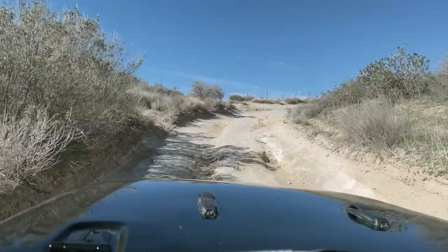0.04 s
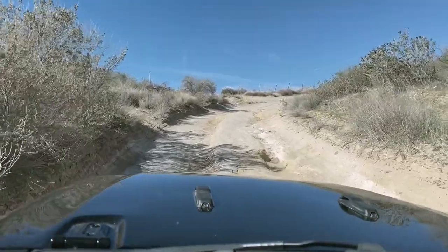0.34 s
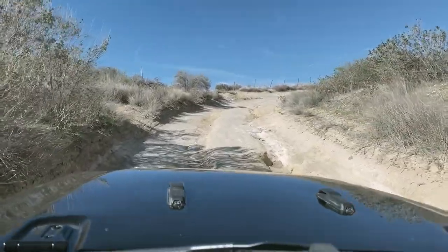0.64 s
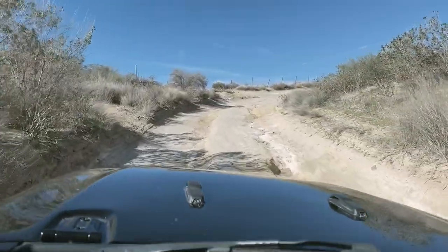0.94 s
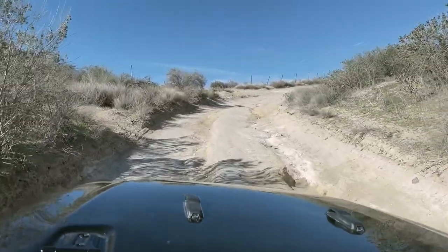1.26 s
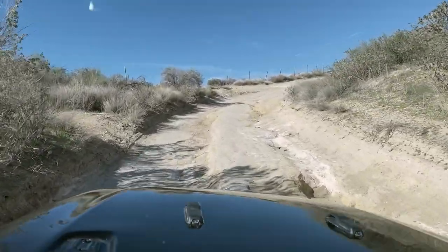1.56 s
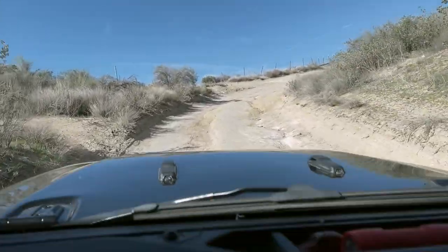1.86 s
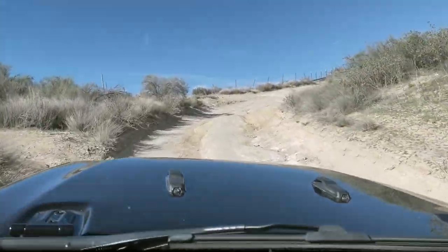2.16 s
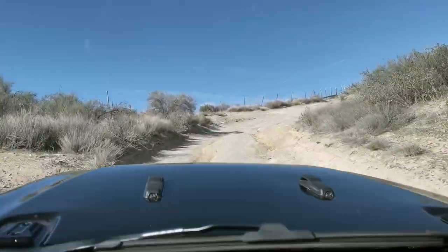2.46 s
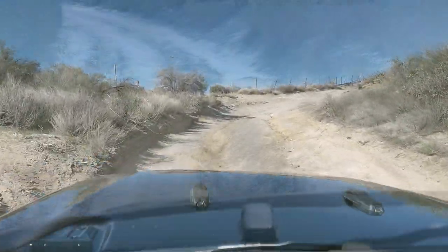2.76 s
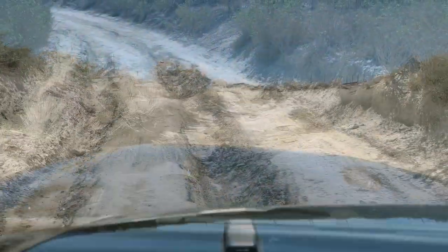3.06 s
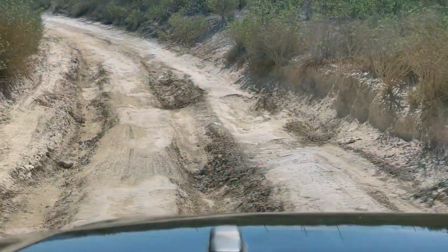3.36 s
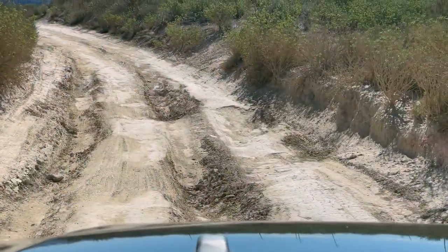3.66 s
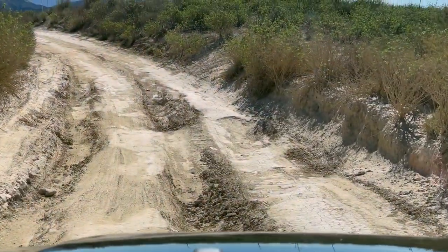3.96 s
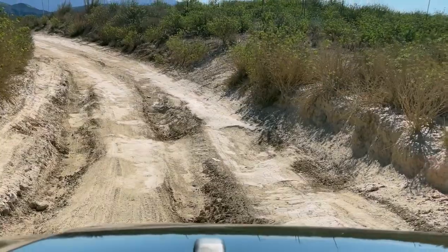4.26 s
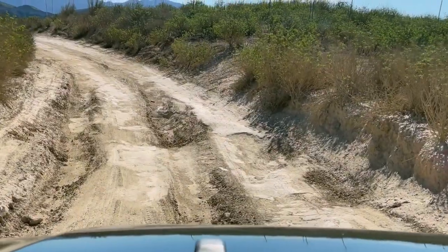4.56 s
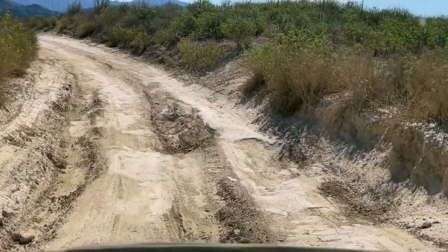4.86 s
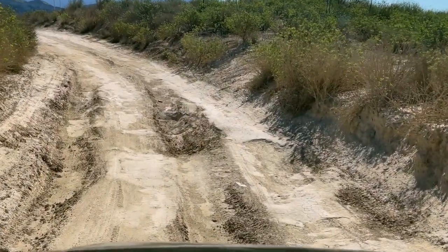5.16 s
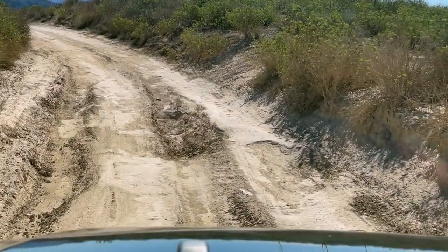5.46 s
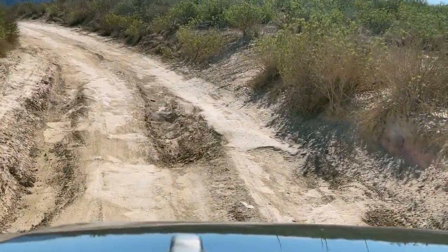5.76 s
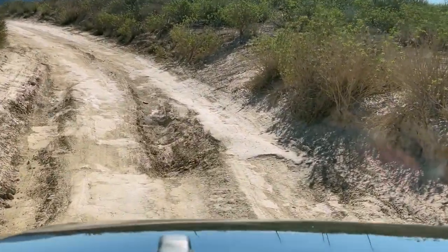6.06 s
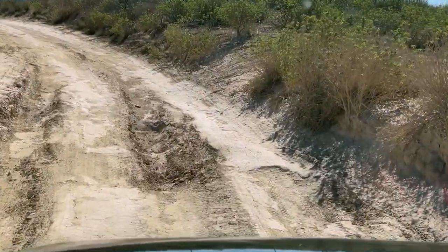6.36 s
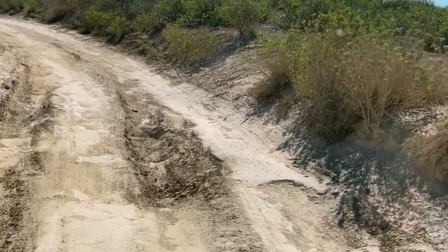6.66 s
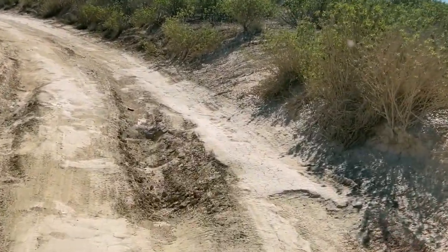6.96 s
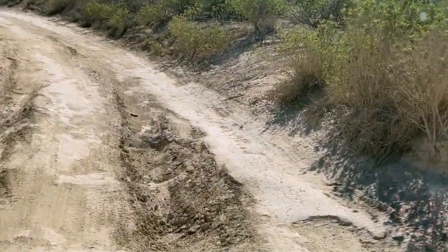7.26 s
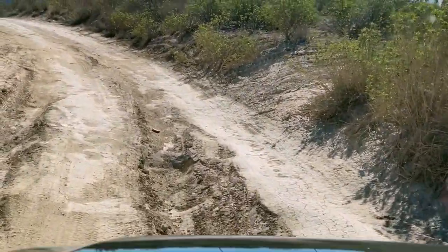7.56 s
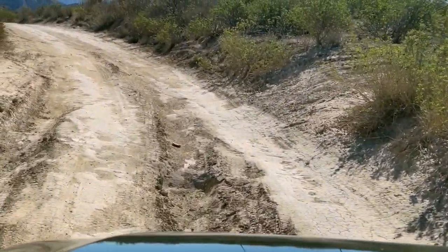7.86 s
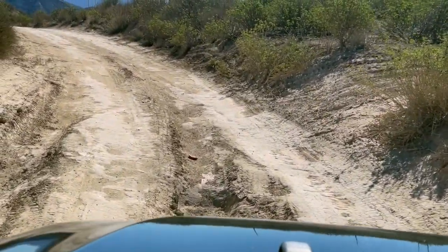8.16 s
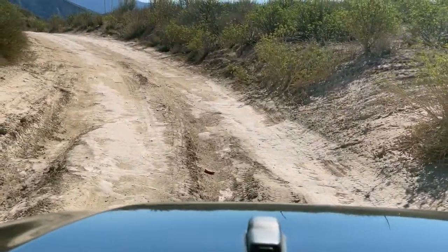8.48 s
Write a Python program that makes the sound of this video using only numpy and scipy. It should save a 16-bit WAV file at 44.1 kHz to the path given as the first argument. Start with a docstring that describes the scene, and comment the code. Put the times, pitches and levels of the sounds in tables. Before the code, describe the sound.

A low engine drone and cabin boom, with clacking gear, ticking trim and bumps as a vehicle creeps along rough dirt.

```python
"""Inside a four-wheel-drive crawling along a rutted dirt trail. The engine drones under the boom of the
shaken cabin, treads crunch over stones and the wheels thud into ruts. As the body twists, trim rustles,
ticks and squeaks, and loose gear clacks and rings. After a first, climbing stretch, air rushes steadily
on the second, where faint whines drift by and something knocks once right beside the microphone."""
import sys
import numpy as np
from scipy import signal
from scipy.fft import rfft, irfft, next_fast_len
from scipy.io import wavfile
from scipy.ndimage import uniform_filter1d, map_coordinates

SR = 44100
rng = np.random.default_rng(int(sys.argv[2]) if len(sys.argv) > 2 else 0)


def to_wav(s):
    """Save 16-bit WAV."""
    ch = np.atleast_2d(s).T  # columns
    pcm = np.round(np.clip(ch, -1, 1) * 32767)  # PCM
    wavfile.write(sys.argv[1], SR, pcm.astype(np.int16))


N = 384552

# trim rustle as the body twists: t/s, level/dB
BODY_TWIST = [(0, -73), (.3, -68.5), (1.15, -59), (1.4, -55.5), (1.75, -52), (2.0, -63.5), (2.55, -51.5),
              (2.78, -63), (3.1, -62), (4.1, -79), (6.3, -79.5), (6.9, -61), (7.35, -65), (7.7, -56),
              (8.72, -62.5)]
# loose gear striking the body: t/s, level/dB, brightness/dB, note/Hz, chatter/s, low-pass/Hz
GEAR_HITS = [(0.2441, -37.5, -21, 1045, 0.0026, 7040), (0.677, -37.5, -7.5, 2300, 0.0098, 8960),
             (0.722, -51, 3.5, 1170, 0.009, 6960), (.758, -44, -5.5, 1060, 0.0035, 8000),
             (.823, -47, -19, 1410, 0.007, 5000), (.882, -46.5, -2.5, 1190, 0.011, 7025),
             (1.404, -48.5, -7, 1700, 0.0071, 6000), (1.446, -40, -1.5, 940, 0.0052, 9000),
             (1.480, -32, -6, 1119, 0.0067, 6000), (1.495, -41.5, -6, 1300, .005, 5000),
             (1.62, -43.5, 0, 2280, 0.016, 8650), (1.69, -45, 1.5, 1750, 0.0049, 9030),
             (1.727, -33.5, -10.5, 1500, 0.015, 9030), (1.743, -30, -5.5, 1070, 0.0099, 9100),
             (1.757, -33, -6, 1302, 0.01, 9000), (1.793, -42, -16, 1050, .003, 7003),
             (1.81, -38.5, -21, 1022, 0.0032, 7005), (2.128, -43.5, -35, 950, 0.011, 6000),
             (2.338, -48.5, -10, 1290, 0.011, 6000), (2.55, -32.5, -5.5, 1620, 0.0091, 6000),
             (2.563, -37.5, -11, 1120, 0.0065, 6995), (2.611, -37, -5, 1300, 0.0061, 6500),
             (2.719, -40.5, -5, 900, 0.0087, 14270), (2.952, -47, -0.5, 1030, 0.022, 9000),
             (2.992, -44.5, -0.5, 1052, 0.025, 7500), (3.138, -42.5, -28, 1000, 0.0048, 6000),
             (3.221, -50, -1.5, 1120, 0.038, 6000), (4.336, -33, -4, 1060, 0.00061, 7950),
             (4.949, -42, -17.5, 1010, 0.0039, 5030), (5.203, -41.5, -12.5, 903.7, 0.0054, 5950),
             (5.507, -49.5, -13, 1950, 0.01, 4500), (5.918, -50, -9, 1750, .012, 5500),
             (7.001, -29, -5.5, 800, 0.0046, 6020), (7.146, -36.5, -5, 1303, 0.011, 11000),
             (7.309, -40.5, -10.5, 1334, 0.0066, 6500), (7.432, -42.5, -28.5, 1014, 0.0073, 4956),
             (7.478, -37.5, -6.5, 995, 0.014, 5000), (7.579, -38, -3.5, 1300, 0.009, 11080),
             (7.731, -31.5, -5, 1030, 0.0082, 8560), (7.809, -28, -3, 1660, 0.004, 6940),
             (8.188, -39.5, -5.5, 1085, 0.0025, 7090), (8.369, -43, -5.5, 910, 0.0049, 7500),
             (8.587, -34.5, -7.5, 1328, 0.0029, 5910), (8.599, -45, -7, 1300, 0.0026, 8450)]
TICK_CHATTER_S = 0.0066


def amp(db):
    """Decibels to gain."""
    return 10 ** (np.asarray(db) / 20)


def along(points, hz):
    """Read (f/Hz, value) points on a log axis."""
    f, v = np.transpose(points)
    return np.interp(np.log(hz + 1), np.log(f + 1), v)


def curves(rows):
    """One value per sample for each column after the time."""
    s, *cols = np.transpose(rows)
    return [np.interp(np.arange(N) / SR, s, c) for c in cols]


def wobble(rate):
    """A smooth random curve, rate knots a second."""
    knots = rng.standard_normal(int(N * rate / SR) + 4)
    return map_coordinates(knots, [np.arange(N) * rate / SR])


def swell(s, length):
    """A smooth rise and fall around time s."""
    return np.exp(-2 * ((np.arange(N) / SR - s) / length) ** 2)


def stretch():
    """Crossfade: near 0 on the first stretch of trail, near 1 on the second."""
    return curves([(2.7, 0.012), (3.5, 0.99)])[0]


def filtered(x, response):
    """EQ x with a gain that is a function of frequency."""
    m = next_fast_len(N + SR // 2)
    return irfft(rfft(x, m) * response(np.fft.rfftfreq(m, 1 / SR)), m)[..., :N]


def rush(spectrum, alike, peaks=()):
    """Coloured stereo noise, mid at rms 1; alike is one coherence or (f/Hz, coherence) points."""
    def response(hz):
        coherence = along(alike, hz) if np.ndim(alike) else np.full_like(hz, alike)
        turn = np.arccos(np.clip(coherence, 0, 1)) / 2
        lift = sum(db / (1 + ((hz - centre) / width) ** 2) for centre, width, db in peaks)
        return amp(along(spectrum, hz) + lift) * [np.cos(turn), np.sin(turn)]
    mid, side = filtered(rng.standard_normal((2, N)), response)
    return np.array([mid + side, mid - side]) / np.std(mid)


def pan(left_db):
    """Channel gains for a left-minus-right level."""
    return amp([[left_db / 2], [-left_db / 2]])


def add(track, s, sound):
    """Mix a sound into a track at time s."""
    part = track[..., max(round(s * SR), 0):][..., :sound.shape[-1]]
    part += sound[..., :part.shape[-1]]


def ring(t, hz, t60, attack):
    """One damped mode."""
    return np.sin(2 * np.pi * hz * t) * np.exp(-np.log(1000) * t / t60) * (1 - np.exp(-t / attack))


def part_ring(spectrum, alike, count, note_hz, note_db, peaky_db=4):
    """Stereo ring of one loose part: dense modes, lifted around its own note."""
    hz = np.fft.rfftfreq(count, 1 / SR)
    modes = peaky_db * map_coordinates(rng.standard_normal(128), [np.sqrt(hz) / 1.3], order=1)
    note = note_db / (1 + ((hz / note_hz - 1) / .06) ** 2)
    colour = amp(along(spectrum, hz) + modes + note)
    mid, side = irfft(rfft(rng.standard_normal((2, count))) * colour, count)
    side *= np.sqrt((1 - alike) / (1 + alike))
    return np.array([mid + side, mid - side]) / np.std(mid)


def burst(t, attack, chatter, t60):
    """Envelope of a rattle: a hard first contact, a hold while it chatters, then decay."""
    blow = 1 + 0.94 * np.exp(-t / 0.0018)
    return blow * (1 - np.exp(-t / attack)) * amp(-60 * np.maximum(t - chatter, 0) / t60)


def engine(flutter_db=3):
    """The firing note, its half-rate throb and weak higher orders, rougher on the second stretch."""
    throttle = [(0, 95.4, -46, -49), (.62, 109.1, -37, -31.5), (1.05, 103.4, -34.5, -51.5),
                (1.55, 114.5, -43, -36), (2.15, 129.8, -46.5, -33), (2.33, 116.9, -32.5, -37.5),
                (2.75, 115.3, -37, -37), (3.1, 111.4, -46, -42.5), (3.55, 100.1, -40.5, -41),
                (4.15, 110.9, -36, -40.5), (4.7, 113.4, -39.5, -28), (5.2, 104.8, -37, -27),
                (5.7, 99.86, -43, -44), (6.2, 105.6, -41.5, -36.5), (6.6, 113.2, -49, -44),
                (7.2, 106.2, -31, -40), (7.8, 103.6, -47.5, -32.5), (8.72, 111.1, -39, -31)]  # a feathered throttle: t/s, firing rate/Hz, drone/dB, throb/dB
    hz, db, throb_db = curves(throttle)
    uneven = .022 + .026 * stretch()
    phase = 2 * np.pi * np.cumsum(hz * (1 + uneven * wobble(25))) / SR
    orders = [(.5, throb_db), (1, db), (1.5, db - 19.5), (2, db - 17), (2.5, db - 17), (3, db - 24)]
    drone = sum(amp(level + flutter_db * wobble(14)) * np.sin(k * phase) * pan(-3.5 if k < 1 else -6.5)
                for k, level in orders)
    return np.sqrt(2) * drone


def cabin():
    """The trail shakes the body: a deep boom of the enclosed air and a shudder of the panels."""
    # spectra: f/Hz, level/dB
    climb_eq = [(12, -20.5), (25, -3), (38, 5.5), (50, 1), (60, 10.5), (72, 2.5), (86, -3), (130, -17.5),
                (220, -62.5), (400, -120)]
    rolling_eq = [(8.8, -22), (15, -7), (48, 3.5), (65, 3.5), (83, -1), (180, -27), (230, -58.5),
                  (400, -120)]
    rut_eq = [(12, -23), (25, -4), (36, -1), (50, -1.5), (66, 4), (83, 1), (110, -9.5), (180, -25),
              (230, -55), (400, -120)]
    shudder_eq = [(70, -30.5), (110, 4.5), (145, 1.5), (215, -8.5), (270, -6.5), (320, -16), (420, -20),
                  (800, -76.5), (1500, -120)]
    # faders: t/s, level/dB
    boom_fader = [(0, -39.5), (.22, -20.5), (.42, -32.5), (.6, -29.5), (.7, -44), (.78, -26.5), (.95, -39),
                  (1.24, -31), (1.5, -29.5), (2.05, -34), (2.45, -26.5), (2.62, -34.5), (2.82, -29),
                  (2.9, -37), (3.0, -31.5), (3.55, -32.5), (3.8, -25.5), (4.2, -24.5), (4.35, -25.5),
                  (4.45, -22), (4.75, -22), (4.92, -18.5), (5.1, -21.5), (5.65, -20), (6.0, -23),
                  (6.11, -28.5), (6.22, -21), (6.45, -23), (6.95, -20.5), (7.3, -22), (7.4, -23.5),
                  (7.52, -20.5), (7.85, -22.5), (8.4, -28.5), (8.72, -25.5)]
    shudder_fader = [(0, -43), (.5, -40.5), (1.25, -41.5), (1.55, -34), (1.95, -40.5), (2.9, -39.5),
                     (3.4, -43), (4.0, -41), (5.5, -40), (6.7, -34.5), (7.5, -35.5), (8, -35.5),
                     (8.72, -35.5)]
    rut_blend = [(6.4, 0), (7.1, 0.97)]  # deep ruts near the end: t/s, share of the boom
    lurches = [(0.235, -12.5, 48.15, 0.12), (3.793, -18, 49, 0.14), (4.899, -14.5, 62, 0.068),
               (5.625, -16.5, 72.16, 0.074), (5.75, -17, 75, .05), (6.233, -16, 72.46, 0.065),
               (6.64, -12.5, 67, 0.087), (6.814, -12.5, 47.8, 0.051)]  # the body lurches, the air swings: t/s, level/dB, f/Hz, length/s
    t, later, ruts = np.arange(N) / SR, stretch(), curves(rut_blend)[0]
    boom_db = curves(boom_fader)[0] + wobble(15)  # swells as the body rocks
    rolling = np.sqrt(1 - ruts) * rush(rolling_eq, alike=1) + np.sqrt(ruts) * rush(rut_eq, alike=1)
    boom = np.sqrt(1 - later) * rush(climb_eq, alike=0.93) + np.sqrt(later) * rolling
    swing = sum(amp(db) * swell(s, length) * np.sin(2 * np.pi * hz * t) for s, db, hz, length in lurches)
    boom += swing / amp(boom_db - 1)  # in a lurch one air mode takes over
    running_rms = np.sqrt(np.abs(uniform_filter1d(boom[0] ** 2, size=SR // 9)) + 1e-6)
    shudder = rush(shudder_eq, alike=0.7) * amp(curves(shudder_fader)[0] + 2.47 * wobble(13))
    return (boom / running_rms * amp(boom_db) + shudder) * pan(-2.5)


def roar():
    """Tyres grind over dirt in uneven patches; on the second stretch a steady rush of air takes over."""
    fader = [(0, -56.5), (.85, -50), (1.15, -52), (1.55, -47), (2.0, -50), (2.58, -46), (2.75, -51),
             (3.7, -47), (6.5, -46), (7.0, -41.5), (7.35, -45.5), (7.7, -40.5), (8.1, -46), (8.72, -46.5)]  # tyres and air together: t/s, level/dB
    air_blend = [(2.7, 0.076), (3.4, 0.99), (6.3, 0.79), (7.2, 0.4), (8.7, 0.79)]  # t/s, air's share of the roar
    # spectra: f/Hz, level/dB
    tyre_eq = [(200, -14.5), (262, 1.5), (320, 0.5), (450, -1.5), (680, -9.5), (1080, -8.5), (2000, -23),
               (3500, -43), (8000, -49), (12000, -120)]
    air_eq = [(160, -26.5), (280, -11.5), (400, -1.5), (520, 1), (620, -2), (730, -11), (1040, -10),
              (1170, -14.5), (1300, -10), (1550, -22.5), (3500, -36), (4600, -50.5), (8500, -36.5),
              (10400, -62), (15300, -52.5)]
    air_coherence = [(300, 0.93), (600, 0.66), (1200, 0.25), (2500, 0.41), (8000, 0.32)]  # likeness of left and right: f/Hz, coherence
    air_resonances = [(505, 65, 2), (830, 33, 4), (1032, 38, 5), (1610, 71, 3.5), (3460, 130, 8),
                      (4260, 110, 14), (6250, 200, 5.5)]  # f/Hz, half width/Hz, lift/dB
    share, = curves(air_blend)
    tyres = rush(tyre_eq, alike=0.26) * amp(-3 + 2.5 * wobble(30)) * pan(-3.1)
    air = rush(air_eq, air_coherence, air_resonances) * amp(-0.5) * pan(-0.88)
    return amp(curves(fader)[0]) * (np.sqrt(1 - share) * tyres + np.sqrt(share) * air)


def rustle_level(stir_db=-19.5, stir_t60=0.42):
    """Rustle in dB: the twisting body stirs the trim, as does each clack, more after a long chatter."""
    power, t = amp(curves(BODY_TWIST)[0]) ** 2, np.arange(SR // 2) / SR
    for s, db, bright_db, _, chatter, _ in GEAR_HITS:
        tail = amp(db + bright_db + stir_db - 60 * t / stir_t60)
        add(power, s, chatter / TICK_CHATTER_S * tail ** 2)
    return 10 * np.log10(power)


def rustle(count=380, spread_db=2.5, contact_db=-2, hiss_db=-4.5):
    """Many tiny contacts in the trim, each with its own ring, over a fine hiss."""
    trim_eq = [(300, -85), (900, -19.5), (1500, 8), (2300, 3), (3500, 1.5), (5500, 3), (8300, -3),
               (9500, -10), (10400, -65.5), (12000, -26.5), (15500, -22.5)]  # rustle spectrum: f/Hz, level/dB
    rustle_db = rustle_level()
    track, t = np.zeros((2, N)), np.arange(SR // 15) / SR
    envelope = burst(t, attack=.002, chatter=.005, t60=.06)
    for place, pitch, size in rng.random((count, 3)):
        contact = part_ring(trim_eq, .4, len(t), note_hz=1300 * 6 ** pitch, note_db=10) * envelope
        db = rustle_db[int(place * N)] + contact_db + spread_db * (2 * size - 0.5)
        add(track, place * N / SR, contact * amp(db))
    hiss = rush(trim_eq, alike=.7) * amp(rustle_db + hiss_db)
    return (track + hiss) * pan(-1)


def gravel(level, count=1500):
    """Small stones crackle under the treads, each a few cycles long; level is a gain per sample."""
    track, t = np.zeros(N), np.arange(SR // 100) / SR
    for place, pitch, size in rng.random((count, 3)):
        hz = 1200 * 3.3 ** pitch
        stone = ring(t, hz, 12 / hz, attack=.0001) * amp(2 + 15 * size ** 3 - 6 * pitch)
        add(track, place * N / SR, stone * level[int(place * N)])
    return track


def scuffs(climb_gravel_db=-6):
    """Treads roll over dirt with a grainy crunch, and slip in short swells, coarse or fine."""
    slips = [(3.366, -64, 0.022, 0.53), (3.486, -64, 0.045, 1), (3.88, -65, 0.036, .9),
             (4.05, -61, 0.026, 0), (5.003, -62, 0.09, 0), (5.05, -63.5, 0.059, 0.77),
             (5.18, -66, .09, 0.074), (5.477, -65.5, 0.074, 0.13), (5.904, -64, 0.045, .1),
             (6.246, -72, 0.28, 0.096), (6.674, -58, 0.031, 1), (6.858, -59, 0.0094, 0.9),
             (7.174, -55, 0.041, 1), (7.88, -56, 0.014, .6), (8.344, -58, 0.074, 0.85),
             (8.501, -50, 0.046, 1)]  # tyres slipping: t/s, level/dB, length/s, share of fine grit
    dirt_fader = [(3, -77.5), (4, -66.5), (5, -72), (6.3, -66.5), (7, -60.5), (8.7, -60)]  # the steady crunch: t/s, level/dB
    # spectra: f/Hz, level/dB
    grit_eq = [(300, -58), (900, -10), (1600, 0), (3500, 2), (5000, 4), (7300, 4), (9000, -6),
               (10500, -36.5), (16000, -64)]
    crunch_eq = [(300, -55.5), (900, 3), (1700, 0.5), (2800, -3), (3600, -6), (4400, -9), (4900, -13),
                 (9000, -25.5), (16000, -85)]
    fine = sum(amp(db) * swell(s, length) * np.sqrt(share) for s, db, length, share in slips)
    coarse = sum(amp(db) * swell(s, length) * np.sqrt(1 - share) for s, db, length, share in slips)
    grains = amp(1.2 * wobble(12) + 2 * wobble(70) + 3.2 * wobble(500))
    crunch_gain = amp(curves(dirt_fader)[0]) + coarse
    stones = gravel(crunch_gain + amp(rustle_level() + climb_gravel_db) * (1 - stretch()))
    grit = rush(grit_eq, alike=0.89) * fine * amp(2.5 * wobble(160))
    crunch = rush(crunch_eq, alike=1) * grains * crunch_gain
    return grit + crunch + stones


def contacts(stray_count=14, stray_db=12.5, stray_bright_db=-7):
    """Cue list of ticks and clacks: t/s, (panel, clack, tick)/dB, note/Hz, chatter/s, low-pass/Hz."""
    trim_ticks = [(0.075, -44, 4240, 8650), (0.43, -40, 3700, 6040), (.522, -43.5, 4230, 7700),
                  (0.788, -62, 2400, 6040), (0.946, -40, 2350, 6000), (.99, -45.5, 5660, 8300),
                  (1.127, -42, 4170, 8100), (1.193, -36.5, 2720, 7150), (1.317, -45, 4500, 6900),
                  (1.34, -45.5, 4060, 7900), (1.378, -44.5, 3680, 5500), (1.417, -43.5, 7450, 10700),
                  (1.426, -39, 5030, 9000), (1.598, -40.5, 3020, 9000), (1.642, -36.5, 2270, 8850),
                  (2.022, -49, 3300, 7015), (2.214, -48, 1900, 6900), (2.299, -43.5, 4300, 7700),
                  (2.333, -50.5, 3470, 8000), (2.427, -51, 4903, 6960), (2.483, -46, 2100, 6900),
                  (2.501, -42, 3430, 9000), (2.706, -39, 4040, 9000), (2.721, -40.5, 8394, 14600),
                  (6.897, -43, 8000, 11950), (7.505, -43, 2381, 7850), (7.873, -51, 7800, 10050),
                  (7.891, -48.5, 7970, 10040), (8.063, -58.5, 6000, 8000)]  # light contacts: t/s, level/dB, note/Hz, low-pass/Hz
    twist_db, later = curves(BODY_TWIST)[0], stretch()
    strays = []
    for place, size, pitch in rng.random((stray_count, 3)):
        db = twist_db[int(place * N)] + stray_db + 5.5 * (2 * size - 1)
        hz = np.interp(pitch, [0, 1], [950, 2300])
        strays.append((place * N / SR, db, stray_bright_db, hz, TICK_CHATTER_S, 7000))
    # a tick barely wakes the panel and the heavier gear
    cues = [(s, (db - 4.5, db - 8.5, db), hz, TICK_CHATTER_S, top) for s, db, hz, top in trim_ticks]
    for s, db, bright_db, hz, chatter, top in list(GEAR_HITS) + strays:
        # the panel booms more under a dull blow, and on the second stretch
        panel_db = db - 1.5 - 0.25 * bright_db + 7 * later[int(s * SR)]
        cues.append((s, (panel_db, db, db + bright_db), hz, chatter, top))
    return cues


def rattles(attack=0.0011, clean_click_s=0.00033):
    """Loose parts chatter, then die away quickly in the padded cabin; soft contacts lose their top."""
    # spectra: f/Hz, level/dB
    panel_eq = [(150, -29), (260, 7), (320, 0), (370, 3.5), (450, -1.5), (570, 0.5), (700, -5),
                (950, -13.5), (2000, -60.5), (4000, -120)]
    clack_eq = [(300, -82), (550, -17), (850, 4), (1100, 2.5), (1350, 1.5), (1700, -1.5), (2300, -9),
                (3000, -15.5), (6000, -73.5), (10000, -120)]
    tick_eq = [(600, -82), (1700, -3), (2600, -2), (3800, -4), (6000, -3.5), (8500, -6), (9600, -11.5),
               (10500, -30.5), (12000, -11.5), (15500, -3.5)]
    # spectrum, coherence, t60/s, level/dB
    voices = [(panel_eq, .4, 0.065, -5), (clack_eq, .15, 0.065, -4), (tick_eq, .3, 0.081, -1)]
    track, t = np.zeros((2, N)), np.arange(SR // 8) / SR
    for s, levels, note_hz, chatter, top_hz in contacts():
        loose = chatter / (chatter + clean_click_s)  # a very short contact is one click and dies sooner
        softness = signal.butter(3, top_hz, fs=SR, output="sos")
        for db, (spectrum, alike, t60, voice_db) in zip(levels, voices):
            sound = part_ring(spectrum, alike, len(t), note_hz, note_db=7.5)
            sound *= burst(t, attack * loose, chatter, t60 * loose)
            add(track, s, signal.sosfilt(softness, sound) * amp(db + voice_db))
    return track * pan(-1.1)


def gear(scatter_db=2.5):
    """Each hit sets the gear's few modes ringing at once; a dull blow wakes mostly the low ones."""
    modes = [(1045, -2.5, 0.046), (1320, -5.5, 0.049), (1700, -8, .05), (2230, -14.5, 0.037),
             (2957, -15.5, 0.032), (4800, -18.5, 0.027)]  # ring of the loose gear: f/Hz, level/dB, t60/s
    track, t = np.zeros((2, N)), np.arange(SR // 8) / SR
    for s, db, bright_db, *_ in GEAR_HITS:
        for hz, level, t60 in modes:
            size, detune, lean = rng.standard_normal(3)
            dull_db = min(bright_db + 6, 0) * np.log2(hz / modes[0][0]) / 2
            mode = ring(t, hz * (1 + .02 * detune), t60, attack=.0004) * pan(3 * lean)
            add(track, s + 0.000984, mode * amp(db + level + dull_db + scatter_db * size))
    return track


def clinks(t60=.055):
    """Small metal fittings ring on after a jolt, each with a close pair of modes."""
    jolts = [(.431, -41, 3770), (0.677, -36, 2200), (0.68, -39.5, 1210), (1.426, -38, 5090),
             (1.424, -39, 7700), (1.488, -30, 1100), (2.557, -30, 1110), (2.614, -34, 1300),
             (2.706, -38, 4040), (2.722, -46, 8300), (2.72, -39.5, 2980), (7.152, -35, 1300),
             (7.582, -32.5, 1320), (7.888, -38.5, 1320)]  # t/s, level/dB, f/Hz
    track, t = np.zeros(N), np.arange(SR // 6) / SR
    for s, db, hz in jolts:
        pair = ring(t, hz, t60, attack=.0008) + .5 * ring(t, hz * 1.03, t60 / 2, attack=.0008)
        add(track, s, amp(db) * pair)
    return track * pan(-1)


def thuds():
    """A wheel hits a rut and the body answers with a few low cycles; a struck panel hums on longer."""
    ruts = [(1.12, -21, 320, 7.1), (1.465, -16.5, 179, 6.4), (1.55, -25, 281, 23), (1.569, -18, 162, 6),
            (1.745, -14, 150, 7.5), (1.743, -19.5, 362, 23), (2.721, -16, 265, 11),
            (4.591, -17.5, 299, 6.96), (6.013, -15.5, 45.2, 8.67), (6.909, -8, 118, 7.4),
            (6.962, -9.5, 320, 6.6), (6.998, -8.5, 153, 6), (7.156, -15, 141, 4.8), (7.181, -8.5, 165, 9.1),
            (7.479, -1.5, 258, 4.1), (7.484, -1.5, 130, 4.1), (7.59, 0.5, 130, 5.3), (7.699, -9, 158, 7.9),
            (7.739, -18.5, 412, 12), (8.071, -14, 129.1, 4.3), (8.488, -15.5, 161, 7)]  # wheel drops: t/s, level/dB, f/Hz, decay/cycles
    track, t = np.zeros(N), np.arange(SR // 5) / SR
    for s, db, hz, cycles in ruts:
        add(track, s, -amp(db + 5.5) * ring(t, hz, cycles / hz, attack=0.0071))
    return track * pan(-5)


def squeaks():
    """Dry, wavering chirps of trim rubbing on trim."""
    rubs = [(1.278, -55, 7700, 0.037), (4.023, -64, 4260, 0.085), (4.255, -61.5, 4300, 0.042),
            (5.0, -70, 4300, .05), (5.92, -66, 4370, .06), (6.94, -44, 3360, 0.0065)]  # t/s, level/dB, f/Hz, length/s
    waver = 1 + .036 * wobble(900)
    phase_per_hz = 2 * np.pi * np.cumsum(waver) / SR
    return sum(amp(db) * swell(s, length) * np.sin(hz * phase_per_hz) for s, db, hz, length in rubs)


def snaps(cycles=9):
    """A stone shoots from under a tread with one dry click."""
    stones = [(2.7069, -28, 8600), (3.343, -41, 7940), (3.345, -37.5, 3900), (4.336, -30.5, 6250),
              (7.516, -27, 6450), (7.762, -30, 1900), (8.496, -26, 6800)]  # t/s, level/dB, f/Hz
    track, t = np.zeros(N), np.arange(SR // 50) / SR
    for s, db, hz in stones:
        add(track, s, amp(db) * ring(t, hz, cycles / hz, attack=.00005))
    return track


def whine(sag_per_s=.005):
    """Very faint, rough whines swell, sag a little in pitch and fade, in a thin sizzle."""
    whines = [(5.7, -76.5, 2520, 1.3), (6.0, -82, 5570, 1.2), (6.4, -84, 11180, 1.7)]  # t/s, level/dB, f/Hz, length/s
    sizzle_eq = [(5000, -35.5), (10500, -21.5), (11300, 0.5), (13300, -13.5), (15400, 2)]  # f/Hz, level/dB
    t, tones = np.arange(N) / SR, np.zeros(N)
    for s, db, hz, length in whines:
        rough_hz, flicker = 55 * wobble(200), amp(3 * wobble(25))
        phase = 2 * np.pi * np.cumsum(hz * (1 - sag_per_s * (t - s)) + rough_hz) / SR
        tones += amp(db) * flicker * swell(s, length) * np.sin(phase)
    return tones + rush(sizzle_eq, alike=.9) * amp(-76) * stretch()


def knock():
    """A sharp touch, a hard hollow knock and its rebound, close to the microphone."""
    blows = [(6.0155, -23, -17, 8400), (6.0254, -5, -10, 3776), (6.03, -21.5, -41, 2000)]  # t/s, body/dB, snap/dB, snap low-pass/Hz
    modes = [(448, -1.5, 0.018), (730, -3, 0.027), (1325, 2.5, 0.0075), (1450, 0, 0.0062),
             (2720, 8, 0.0021), (4300, -21, 0.0016)]  # the hollow ring: f/Hz, level/dB, t60/s
    track, t = np.zeros(N), np.arange(SR // 10) / SR
    body = sum(amp(level) * ring(t, hz, t60, attack=0.0019) for hz, level, t60 in modes)
    snap = (t == 0) + amp(-7) * ring(t, hz=2600, t60=0.0036, attack=0.00038)
    for s, db, snap_db, top_hz in blows:
        softness = signal.butter(3, top_hz, fs=SR, output="sos")  # a longer contact gives a duller snap
        add(track, s, amp(db) * body + signal.sosfilt(softness, amp(snap_db) * snap))
    return track * pan(-4)


def perspective(x):
    """The low mids lean right; the treble is wide on the first stretch and nearly mono on the second."""
    image = [(260, 0, 0, -0.5), (547, 5.5, 0.5, -4.5), (1100, 3, 1.5, 1.5), (2500, 3, -11.5, -0.5),
             (6000, 4, -14.5, -0.5)]  # f/Hz, first-stretch width/dB, second-stretch width/dB, left minus right/dB
    def gain(column):
        return lambda hz: amp(along(np.array(image)[:, [0, column]], hz))
    first_width, second_width, balance = gain(1), gain(2), gain(3)
    mid, side = (x[0] + x[1]) / 2, (x[0] - x[1]) / 2
    later = stretch() / stretch().max()
    side = (1 - later) * filtered(side, first_width) + later * filtered(side, second_width)
    return filtered(np.array([mid + side, mid - side]), lambda hz: balance(hz) ** np.array([[.5], [-.5]]))


def scene():
    """Everything heard from the front seat."""
    bed = engine() + cabin() + roar()
    dirt = scuffs() + snaps()
    loose_parts = rustle() + rattles() + gear() + clinks() + squeaks()
    return perspective(bed + dirt + loose_parts + thuds() + knock() + whine())


def record(dry):
    """A brick-wall low-pass takes off the very top."""
    return filtered(dry, lambda hz: hz < 15850)


dry = scene()
out = record(dry)
to_wav(out)
```